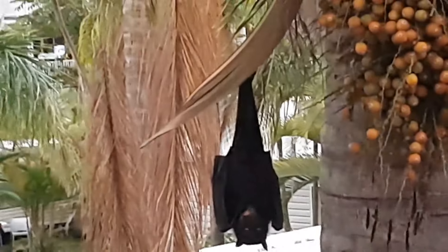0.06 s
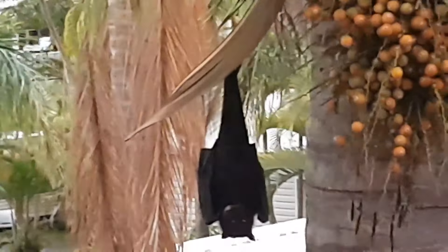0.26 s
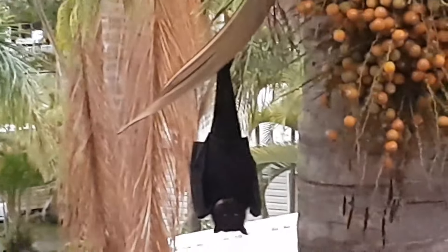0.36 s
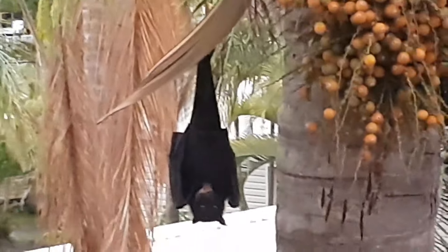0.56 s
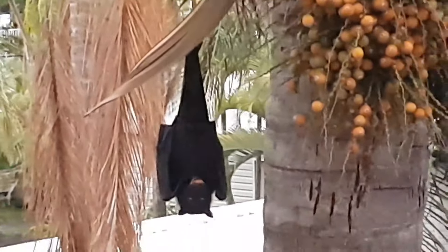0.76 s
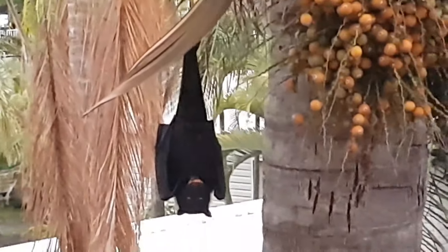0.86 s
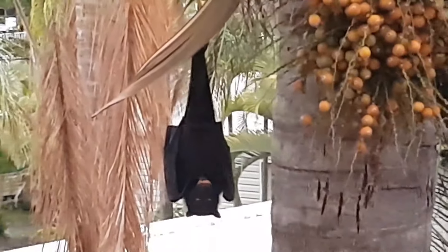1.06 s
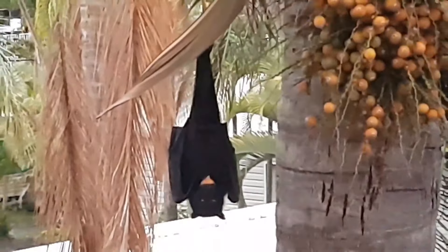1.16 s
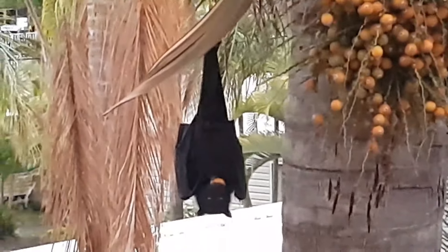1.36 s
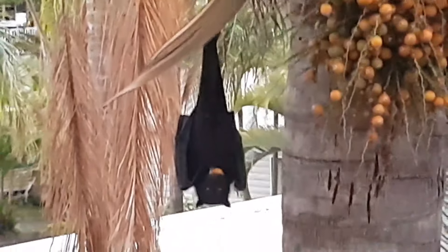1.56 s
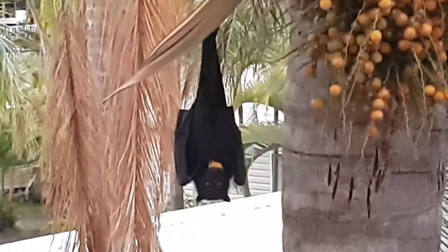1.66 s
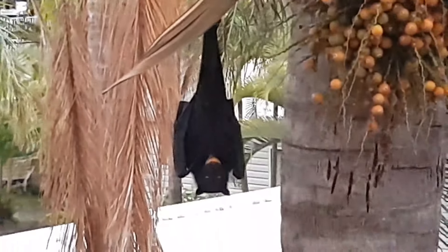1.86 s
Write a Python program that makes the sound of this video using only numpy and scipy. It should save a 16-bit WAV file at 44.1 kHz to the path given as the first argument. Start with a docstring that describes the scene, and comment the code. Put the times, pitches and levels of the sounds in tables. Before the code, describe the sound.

A fruit bat in a backyard palm gives soft nasal grunts, then a long harsh squawk, a short sharp one and a weaker rasp, over thin insect drone, tiny chirps and distant engine hum.

```python
"""A backyard palm: a hanging flying fox grunts softly, then gives a long harsh squawk, a short one and a weaker rasp.
A few more grunts lead into the short one. Each call is a ragged train of throat pulses and rushing air,
coloured by the resonances of throat and mouth and echoed by the yard.
Behind it: a thin insect drone (filtered noise), tiny paired chirps (falling sines), the hum and road noise
of a distant engine (wavering hum tones, filtered noise) and a bed of outdoor air (shaped noise)."""
import sys
import numpy as np
from scipy import signal
from scipy.fft import rfft, irfft
from scipy.io import wavfile
from scipy.ndimage import uniform_filter1d

SR = 44100
rng = np.random.default_rng(int(sys.argv[2]) if len(sys.argv) > 2 else 0)


def generate_wav(signal):
    """Clip the signal to [-1, 1] and save it as 16-bit WAV at the path in sys.argv[1]."""
    frames = np.transpose(np.atleast_2d(signal))
    scaled = np.clip(frames, -1, 1) * 32767
    pcm = np.round(scaled).astype(np.int16)
    wavfile.write(sys.argv[1], SR, pcm)


N = 85995
T = np.arange(N) / SR
TOP_HZ = 8750


def undb(db):
    """Decibels to gain."""
    return 10 ** (np.asarray(db) / 20)


def unit(x):
    """Scale to rms 1."""
    return x / np.sqrt(np.mean(x ** 2) + 1e-18)


def walk(rate_hz):
    """Random drift of rms 1 that glides to a new value rate_hz times a second."""
    step = max(int(SR / rate_hz), 2)
    stairs = np.repeat(rng.standard_normal(N // step + 2), step)
    return unit(uniform_filter1d(stairs, step)[:N])


def resonate(x, modes, shift=None, gaps=()):
    """Colour a sound with resonances, movable by a factor, and cut notches into it; rms 1."""
    f, t, spectrum = signal.stft(x, SR, nperseg=1024, noverlap=768)
    f = f[:, None]
    move = 1 if shift is None else np.interp(t, T, shift)
    power = 0
    for hz, width_hz, level_db in modes:
        # one width off centre a resonance is 18 dB down
        offset = (f - hz * move) / width_hz
        power = power + undb(level_db) ** 2 / (1 + 3 * offset ** 2) ** 3
    gain = np.sqrt(power)
    for hz, width_hz in gaps:
        gain = gain * (1 - np.exp(-((f - hz) / width_hz) ** 2)) ** 2
    return unit(signal.istft(spectrum * gain, SR, nperseg=1024, noverlap=768)[1][:N])


# gap spread is in natural-log units
MEDIAN_PULSE_HZ, PULSE_GAP_SPREAD, PULSE_SCATTER_DB = 209.16, .3, 3
PULSE_DB, AIR_RUSH_DB, PUFF_DECAY_S = -9, -3.5, 0.0079


def larynx():
    """Chaotic throat pulses, each followed by a decaying puff of turbulent air."""
    gap, size = rng.standard_normal((1200, 2)).T
    times_s = np.cumsum(np.exp(PULSE_GAP_SPREAD * gap)) / MEDIAN_PULSE_HZ
    at = (times_s * SR).astype(int)
    heights = undb(PULSE_SCATTER_DB * np.tanh(size))
    pulses = np.zeros(N)
    pulses[at[at < N]] = heights[at < N]
    puffs = signal.lfilter([1], [1, -np.exp(-1 / (PUFF_DECAY_S * SR))], pulses)
    rush = puffs * rng.standard_normal(N)
    return unit(undb(PULSE_DB) * unit(pulses) + undb(AIR_RUSH_DB) * unit(rush))


MOUTH_SPLIT_HZ, MOUTH_OPENS_S, LOWER_SAG_SHARE = 4500, .07, .2


def squawk(row, mouth, gaps):
    """A harsh push of breath: attack, hold, release; the lower resonances climb as the mouth opens."""
    start_s, attack_s, hold_s, release_s, upper_db, lower_db, sag_db_per_s, shut = row
    age = np.maximum(T - start_s, 0)
    source = larynx()
    attack = np.minimum(age / attack_s, 1)
    release = np.exp(-np.maximum(age - attack_s - hold_s, 0) / release_s)
    opening = 1 - shut * np.exp(-age / MOUTH_OPENS_S)
    lower_modes = [m for m in mouth if m[0] < MOUTH_SPLIT_HZ]
    upper_modes = [m for m in mouth if m[0] > MOUTH_SPLIT_HZ]
    throat = resonate(source, lower_modes, opening, gaps)
    edge = resonate(source, upper_modes, None, gaps)
    # the sag stops growing at the release; a negative one swells
    sag_db = sag_db_per_s * np.minimum(age, attack_s + hold_s)
    throat = throat * undb(lower_db - LOWER_SAG_SHARE * sag_db)
    edge = edge * undb(upper_db - sag_db)
    return attack * release * (throat + edge)


# resonances of throat and mouth, one table per call: centre_hz, width_hz, level_db (relative)
LONG_MOUTH = [(1360, 1500, -20.5), (2140, 690, -12), (2580, 170, -7.5), (3005, 510, -1.5),
              (3470, 200, -4.5), (4080, 1220, -6.5), (4600, 900, -11), (5670, 1650, -1), (6070, 590, 4),
              (6550, 540, 1.5), (7420, 1600, 3.5), (8360, 620, 2)]
SHORT_MOUTH = [(1160, 580, -9.5), (1840, 200, -11.5), (2250, 220, 5.5), (2450, 280, -0.5), (2940, 390, 4),
               (4060, 1350, -5), (4900, 620, -3), (5540, 470, 0.5), (6030, 780, 0), (6750, 690, 3),
               (7380, 190, 2), (8200, 1600, 0.5)]
RASP_MOUTH = [(1305, 530, -6), (1606, 270, -16.5), (2390, 370, 1), (2580, 320, 0), (2945, 670, -0.5),
              (3530, 200, -2), (4750, 1100, -7), (5590, 370, -7), (6450, 1400, -6.5), (7500, 650, -2),
              (8160, 650, -6)]
# narrow quiet bands cut into each call's spectrum: centre_hz, width_hz
LONG_GAPS = [(4540, 103), (2430, 42)]
SHORT_GAPS = [(4720, 83), (2075, 110), (3480, 56), (4335, 52)]
RASP_GAPS = [(4270, 170), (3860, 210), (2040, 100), (3415, 44)]
# squawks and short pushes within them: start_s, attack_s, hold_s, release_s,
# upper_db, lower_db (resonances above and below the split), sag_db_per_s, shut (0-1, at the start)
SQUAWKS = [(0.534, 0.023, 0.083, 0.087, -28, -37, -2, 0.19),
           (0.645, 0.15, 0.082, 0.042, -26.5, -37, 29, 0.39),
           (1.307, 0.029, .013, 0.033, -23.5, -32, 24, 0.05),
           (1.362, 0.024, 0.12, 0.016, -45, -44, 8, 0.17),
           (1.516, 0.0093, 0.0088, 0.008, -38.5, -41, 3, 0.15),
           (1.544, 0.04, 0.047, 0.051, -33.5, -39, 62, 0)]


def squawks():
    """The long squawk, the short one and the rasp: two pushes each through one mouth shape."""
    long = (LONG_MOUTH, LONG_GAPS)
    short = (SHORT_MOUTH, SHORT_GAPS)
    rasp = (RASP_MOUTH, RASP_GAPS)
    shapes = [long, long, short, short, rasp, rasp]
    return sum(squawk(row, mouth, gaps) for row, (mouth, gaps) in zip(SQUAWKS, shapes))


# soft grunts: start_s, length_s (up to the release), level_db, low_hz, low_db, main_hz, upper_db, hiss_db
# (the last dB columns are relative to the main resonance for low and upper, to the body for hiss)
GRUNTS = [(0.133, .04, -47, 1085, 2, 1514, 3, -1.5), (0.179, 0.059, -47.5, 1070, -10, 1488, -13, 2),
          (0.242, 0.037, -49, 1060, -1.5, 1700, -0.5, 0),
          (0.279, 0.047, -38.5, 1140, -11.5, 1686, -12.5, -5.5),
          (0.409, 0.068, -53, 1144, -13, 1745, -14, -7.5), (1.221, 0.034, -43.5, 1206, -4, 1930, -23, -18),
          (1.239, 0.039, -43, 1244, -1.5, 1800, -6.5, -6), (1.285, 0.035, -44, 1230, -9, 1870, 10, -2.5)]
# breathy top of a grunt: centre_hz, width_hz, level_db (relative)
GRUNT_HISS = [(2520, 230, -6.5), (3160, 180, -4.5), (3870, 460, -6), (4900, 1100, -8.5), (6220, 820, -0.5),
              (7700, 3300, -7)]
GRUNT_WIDTH_HZ, GRUNT_UPPER_HZ, GRUNT_ATTACK_S, GRUNT_RELEASE_S = 160, 2140, 0.015, 0.0076


def grunts():
    """Quiet nasal calls with the mouth nearly shut: three narrow resonances and a breathy hiss."""
    out = np.zeros(N)
    source = larynx()
    hiss = resonate(source, GRUNT_HISS)
    for start_s, length_s, level_db, low_hz, low_db, main_hz, upper_db, hiss_db in GRUNTS:
        modes = [(low_hz, GRUNT_WIDTH_HZ, low_db),
                 (main_hz, GRUNT_WIDTH_HZ, 0),
                 (GRUNT_UPPER_HZ, GRUNT_WIDTH_HZ, upper_db)]
        body = resonate(source, modes)
        attack = np.clip((T - start_s) / GRUNT_ATTACK_S, 0, 1)
        release = np.exp(-np.maximum(T - start_s - length_s, 0) / GRUNT_RELEASE_S)
        out += undb(level_db) * attack * release * (body + undb(hiss_db) * hiss)
    return out


YARD_T60_S, YARD_DELAY_S, YARD_DB = 0.4, .012, -2
WALL_S, WALL_DB = .0074, -10  # wall level relative to the whole scattered tail


def yard(x):
    """One close wall, then scattered echoes from house and foliage: noise that decays exponentially."""
    t = T[:SR // 2]
    decay = np.exp(-np.log(1000) * t / YARD_T60_S)
    tail = rng.standard_normal(len(t)) * decay * (t > YARD_DELAY_S)
    tail = tail / np.sqrt(np.sum(tail ** 2))
    tail[int(WALL_S * SR)] += undb(WALL_DB)
    return signal.fftconvolve(x, tail)[:N]


# pairs of falling chirps from small unseen callers:
# start_s, level_db (second chirp, at its height), top_hz, fall_hz, length_s, spacing_s (start to start)
CHIRPS = [(.066, -43.5, 5270, 537, 0.015, 0.032), (.182, -43.5, 5900, 705, 0.013, 0.035),
          (.27, -43.5, 5380, 570, 0.021, 0.032), (.416, -42, 5880, 710, 0.014, .039),
          (.487, -43, 5330, 547, 0.019, .033), (1.086, -43, 5310, 570, 0.025, 0.029),
          (1.095, -45, 5980, 706, 0.013, 0.031), (1.255, -47.5, 5180, 451, 0.018, 0.024),
          (1.678, -42.5, 5330, 520, 0.024, 0.038), (1.766, -42, 5950, 754, .012, .038),
          (1.889, -41.5, 5310, 600, .017, 0.028)]
FIRST_CHIRP_DB, CHIRP_ROOM_DB, CHIRP_WOBBLE = -1, -6.5, .012  # wobble: rms share of the pitch


def chirps():
    """Tiny falling whistles in pairs, slightly unsteady, the second one stronger, with yard echo."""
    out = np.zeros(N)
    wobble = 1 + CHIRP_WOBBLE * walk(600)
    for start_s, level_db, top_hz, fall_hz, length_s, spacing_s in CHIRPS:
        for at_s, accent_db in ((start_s, FIRST_CHIRP_DB), (start_s + spacing_s, 0)):
            progress = np.clip((T - at_s) / length_s, 0, 1)
            pitch_hz = (top_hz - fall_hz * progress) * wobble
            whistle = np.sqrt(2) * np.sin(2 * np.pi * np.cumsum(pitch_hz) / SR)
            out += undb(level_db + accent_db) * np.sin(np.pi * progress) * whistle
    return out + undb(CHIRP_ROOM_DB) * yard(out)


# insect drone bands: centre_hz, width_hz, level_db (relative)
INSECTS = [(5120, 760, -2.8), (7895, 350, 0.79)]
INSECTS_DB, INSECT_SHIMMER_DB = -53.5, .8


def insects():
    """A thin, slightly shimmering drone: noise squeezed into the insects' bands."""
    drone = resonate(rng.standard_normal(N), INSECTS)
    return undb(INSECTS_DB + INSECT_SHIMMER_DB * walk(33)) * drone


# engine level over time: time_s, level_db
ENGINE_LEVEL = [(0, -58.5), (.8, -56.5), (1.1, -47.5), (1.5, -46), (1.68, -49.5), (1.82, -45.5),
                (1.95, -49.5)]
# engine hum tones: multiple (of the base pitch, not all whole), level_db (relative)
ENGINE_TONES = [(1, -5), (2, 0.5), (3, -32.5), (3.9, -9)]
ENGINE_HZ, HUM_WAVER_DB = 93.7, 1.5
ROAD_HZ, ROAD_WIDTH_HZ, ROAD_DB = 300, 300, -2  # road level relative to the hum


def engine():
    """A far engine swells and dips: hum tones wavering in pitch and level over a low road noise."""
    pitch_hz = ENGINE_HZ * (1 + 0.0042 * walk(5.886))
    phase = 2 * np.pi * np.cumsum(pitch_hz) / SR
    hum = np.zeros(N)
    for multiple, level_db in ENGINE_TONES:
        tone = np.sin(multiple * phase + rng.uniform(0, 2 * np.pi))
        hum += undb(level_db + HUM_WAVER_DB * walk(16)) * tone
    road = resonate(rng.standard_normal(N), [(ROAD_HZ, ROAD_WIDTH_HZ, 0)])
    time_s, level_db = np.array(ENGINE_LEVEL).T
    return undb(np.interp(T, time_s, level_db)) * (unit(hum) + undb(ROAD_DB) * road)


# colour of the outdoor air: pitch_hz, density_db (relative, per Hz)
AIR = [(20, -2.5), (40, -2), (70, -3.5), (100, 0.5), (160, -1), (260, 1.5), (400, -5.5), (560, -8),
       (800, -13), (1150, -9), (1700, -15.5), (2600, -17.5), (4200, -17), (5500, -16.5), (6800, -18.5),
       (8600, -29)]
AIR_LEVEL_DB = -44.5


def air():
    """Steady suburban rumble with a faint leafy hiss: white noise shaped by a spectral curve."""
    hz, density_db = np.array(AIR).T
    f = np.maximum(np.fft.rfftfreq(N, 1 / SR), 1)
    colour = undb(np.interp(np.log(f), np.log(hz), density_db)) * (f < TOP_HZ + 500)
    noise = irfft(rfft(rng.standard_normal(N)) * colour, N)
    return undb(AIR_LEVEL_DB) * unit(noise)


def scene():
    """The bat and its yard, heard the same in both ears."""
    bat = squawks() + grunts()
    mix = bat + undb(YARD_DB) * yard(bat) + chirps() + insects() + engine() + air()
    return np.array([mix, mix])


def record(dry):
    """The recorder cuts the treble steeply above TOP_HZ, with an elliptic low-pass."""
    lowpass = signal.ellip(10, .2, 80, TOP_HZ, fs=SR, output="sos")
    return signal.sosfilt(lowpass, dry)


dry = scene()
out = record(dry)
generate_wav(out)
```